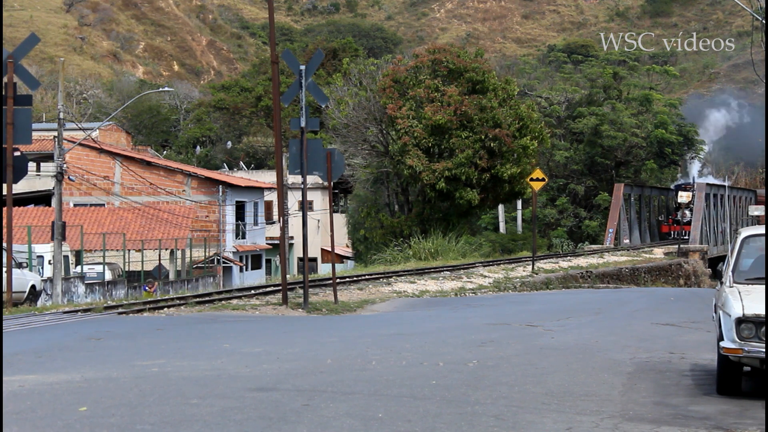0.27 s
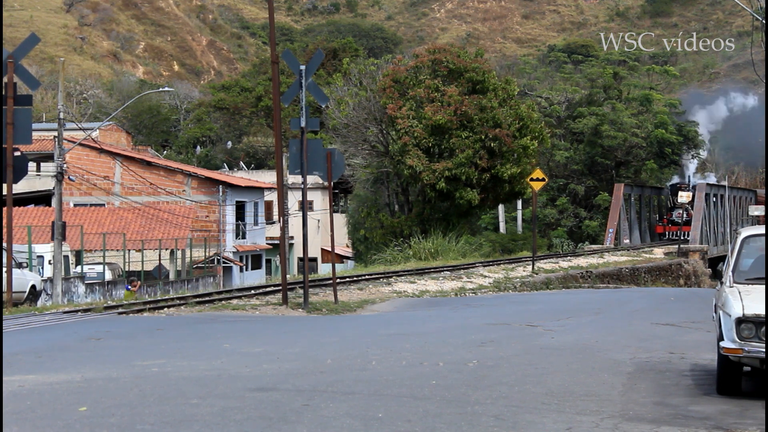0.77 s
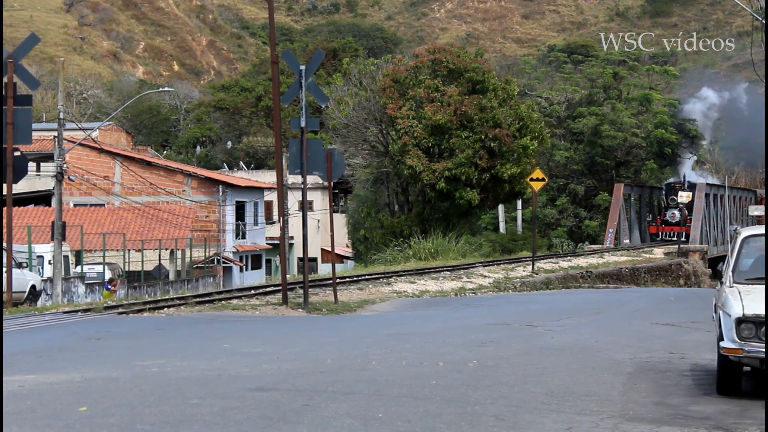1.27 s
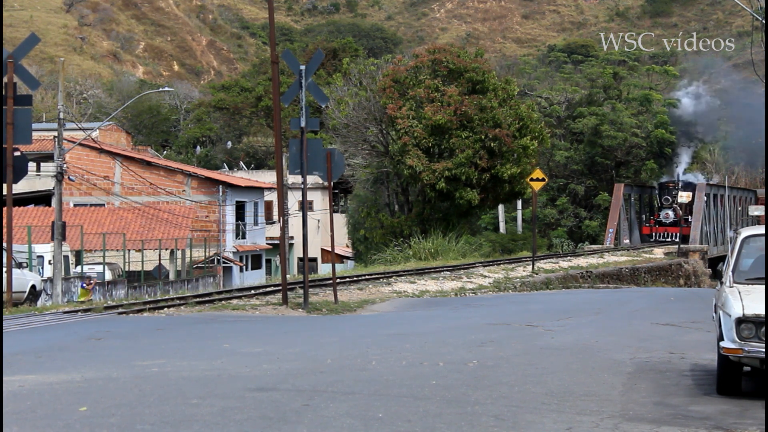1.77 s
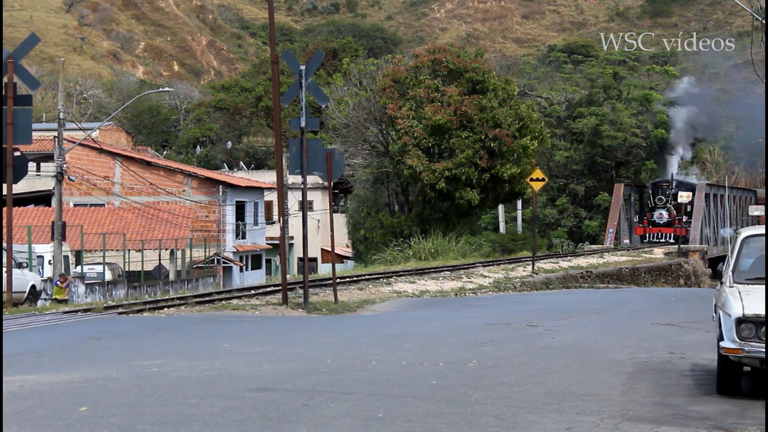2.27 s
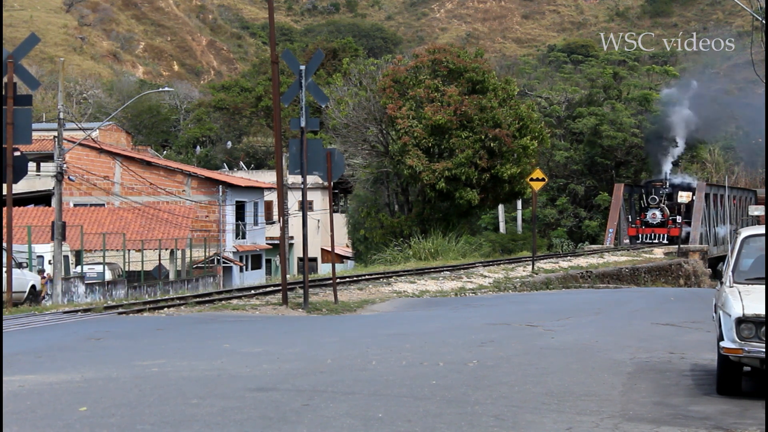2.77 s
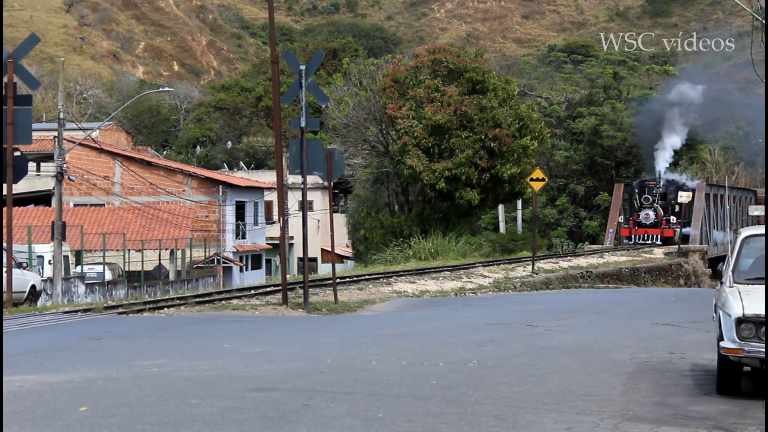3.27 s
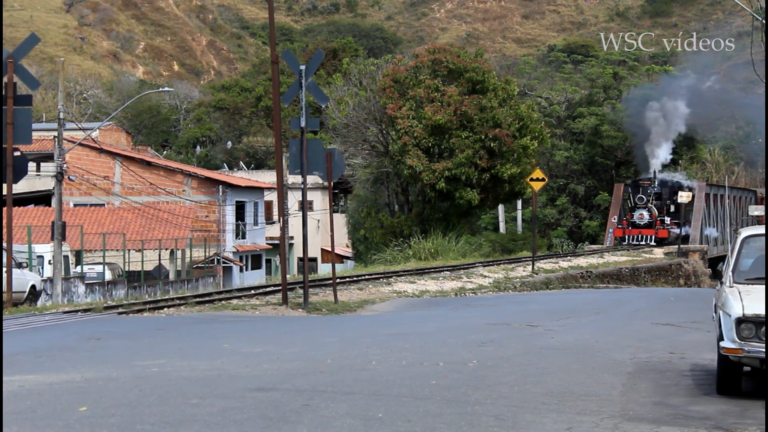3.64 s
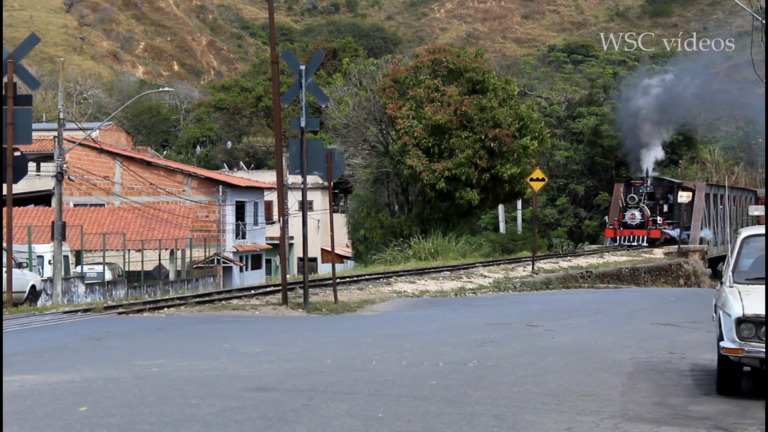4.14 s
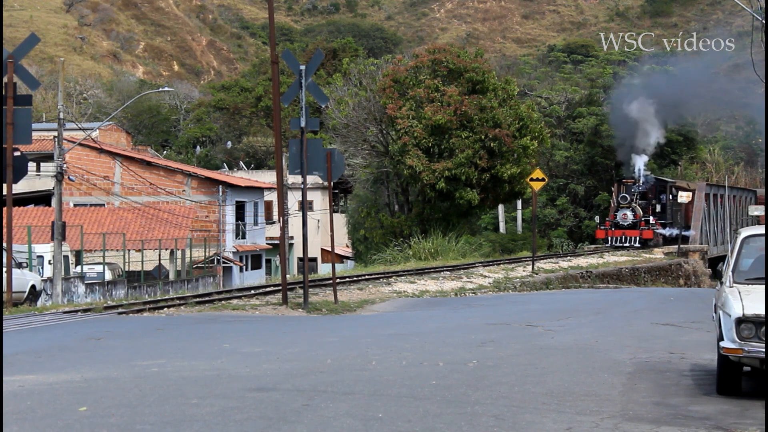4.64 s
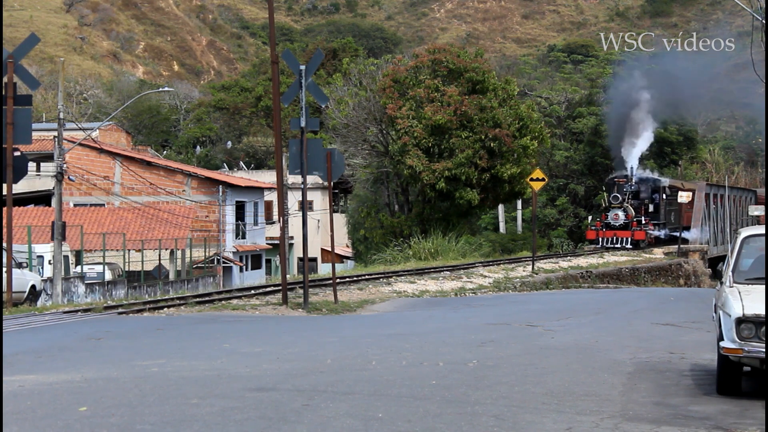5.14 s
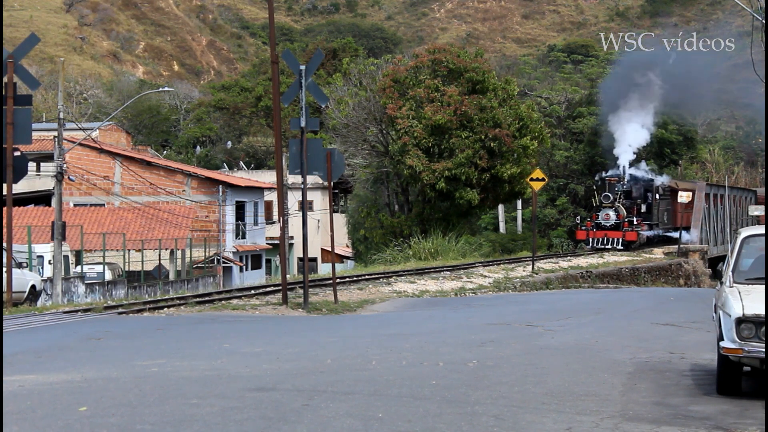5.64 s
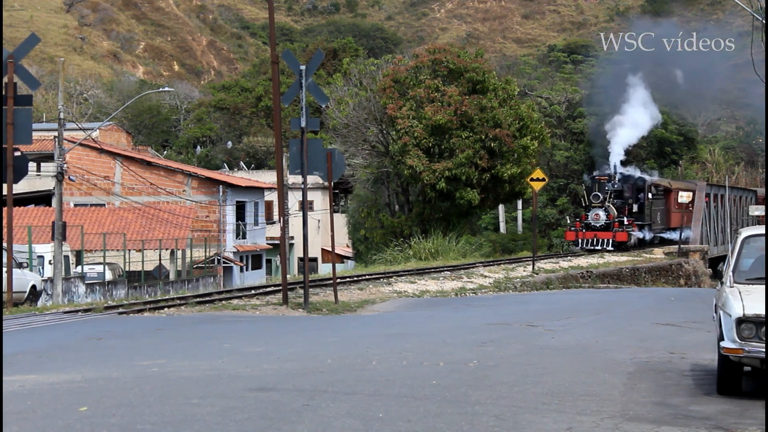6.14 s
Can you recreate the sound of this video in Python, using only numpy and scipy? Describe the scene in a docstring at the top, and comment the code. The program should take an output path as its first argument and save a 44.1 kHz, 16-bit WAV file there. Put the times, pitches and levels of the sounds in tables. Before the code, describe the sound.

Outdoors by a level crossing, a steam locomotive's deep whistle is already blowing, a steady hollow hoot wrapped in breathy steam. After nearly four seconds its pitch droops and wobbles, recovers and stops. A short gap holds only echo and faint hiss, then a much higher, shrill whistle chirps in, pulsing and growing more piercing until the end. Distant rumble stays faint; single-channel pickup from some way off.

```python
"""A steam locomotive's whistles by a level crossing: a long deep blast, under way at 0 s, then a shrill one.
Both are stacks of wavering pipe harmonics; filtered noise makes the steam rushing from their mouths.
Trees and girders behind return flat, beating tones; houses scatter them and slopes echo them, dulled.
Train and street rumble faintly in the distance, a weak moan slides down under the deep blast,
and soft puffs of wind touch the microphone."""
import sys
import numpy as np
from scipy import signal
from scipy.fft import rfft, irfft
from scipy.io import wavfile

SR = 44100
rng = np.random.default_rng(int(sys.argv[2]) if len(sys.argv) > 2 else 0)


def to_wav(sig):
    """Store sig (one row per channel, or 1-D mono) as 16-bit WAV at the path in sys.argv[1].

    Samples outside -1..1 are clipped; the rate is SR.
    """
    pcm = np.clip(np.atleast_2d(sig), -1, 1) * 32767
    pcm = np.round(pcm).astype(np.int16)
    wavfile.write(sys.argv[1], SR, pcm.T)  # frames by channels


N = 282240
TIME = np.arange(N) / SR
BINS_HZ = np.fft.rfftfreq(N, 1 / SR)
DRIFT_STEP = 60  # samples between the points of a slow drift
EDGE_HZ = 15700  # upper band limit of the recorder

# Deep whistle: pitch at full pressure, sag with the cord fully slack, and closing time
DEEP_HZ, SAG_HZ, DEEP_SHUTS_S = 274.04, 9.3, 4.625
# Cord easing off late in the deep blast, then pulled home: [t/s, slack/0-1]
DEEP_CORD_SLACK = [(3.85, 0.01), (3.98, 0.99), (4.13, 0.88), (4.27, .55), (4.39, 0.54), (4.46, 0.06)]
# Moments when the deep pipe overblows: [t/s, half length/s, strength/0-1]
OVERBLOWN_FLARES = [(3.686, 0.053, 0.56), (4.006, 0.069, 0.72), (4.489, 0.025, 0.95)]
# Deep fundamental, before a small trim: [t/s, level/dB]
DEEP_FUNDAMENTAL = [(0.0, -16), (0.09, -13.5), (0.61, -13), (0.77, -13.5), (0.94, -11.5), (1.69, -15),
                    (1.72, -13.5), (2.14, -16), (2.54, -12.5), (2.6, -14), (2.83, -12), (3.07, -16),
                    (3.11, -13.5), (3.53, -16.5), (3.86, -14.0), (3.97, -19), (4.45, -9), (4.62, -15)]
# Deep fourth harmonic, before a small trim: [t/s, level/dB]
DEEP_FOURTH = [(0.0, -26), (0.54, -25.0), (0.71, -32.5), (1.91, -26), (3.31, -26.5), (3.54, -40),
               (3.65, -28), (4.35, -41.5), (4.62, -28.5)]
# Deep seventh harmonic, the thin edge of the tone, before a small trim: [t/s, level/dB]
DEEP_SEVENTH = [(0.0, -36.5), (0.26, -33), (1.03, -44), (1.14, -34), (2.96, -40.5), (3.44, -52),
                (3.58, -40), (4.41, -48), (4.46, -31), (4.58, -29.5), (4.62, -41)]
# Other deep overtones:
# [harmonic number, level at 0 s/dB, change/dB per s, gain at full slack/dB, gain in a full flare/dB]
DEEP_OTHER_OVERTONES = [(2, -37, 0.2, -3, 6.5), (3, -22.5, -0.42, -11.5, 10.5), (5, -36, -.4, 0, 12),
                        (6, -45, 0.73, 5.5, 13), (8, -42.5, -1.13, -.5, 14.5), (9, -43.5, -1.3, -14, 0),
                        (10, -44, -0.66, -9.5, 4), (11, -52, -1, -4, 3), (13, -44, -1, -7, 2)]

# Steam jet of the deep whistle, before trims: [t/s, sizzle level/dB, rush level/dB]
DEEP_JET_LEVELS = [(0.0, -30.5, -34.5), (0.14, -26.5, -30.0), (0.45, -32, -34.5), (0.5, -30.0, -32.0),
                   (0.78, -32.0, -35.5), (1.12, -29, -30), (1.28, -33.5, -34.5), (1.59, -35.0, -34),
                   (1.67, -31.0, -30.5), (2.02, -33.5, -32.5), (2.07, -36, -35.5), (2.81, -28.5, -31),
                   (2.98, -31.5, -34.5), (3.52, -30.0, -35), (3.6, -26.5, -30.5), (4.19, -40.5, -44),
                   (4.31, -34.5, -37), (4.4, -36.5, -44), (4.47, -28, -31), (4.62, -32.0, -36)]
# Colour of a jet's broad rush: [f/Hz, relative level/dB per Hz]
RUSH_COLOUR = [(150, -14.5), (300, -3), (480, -7), (700, -1.5), (1300, -1.5), (1800, 1), (2800, 1),
               (3800, 2), (4800, 0), (6000, -10.5), (8000, -21.5), (11000, -53)]
# Colour of a jet's high sizzle: [f/Hz, relative level/dB per Hz]
SIZZLE_COLOUR = [(2500, -26), (4000, -7), (5500, -2), (7000, 0.5), (8000, -3.5), (9000, -13), (10000, -20),
                 (11500, -30.5), (13000, -42), (15500, -46.5)]

# Distant running gear and street, before trim and drift: [t/s, level/dB]
ROLLING_LEVEL = [(0.0, -45.5), (3.79, -47), (4.48, -40), (4.57, -45), (5.96, -50.5), (6.22, -43),
                 (6.4, -64)]
# Colour of that rumble: [f/Hz, relative level/dB per Hz]
RUMBLE_COLOUR = [(4, -53), (15, -19.5), (35, -8), (60, -11), (90, 0), (140, -5), (188, 4.5), (230, -6),
                 (310, -8), (400, -2.5), (600, -5.5), (1500, -14.5), (4000, -48)]
# Decay of the scattered reflections, which are cut off after 1 s: [f/Hz, t60/s]
VALLEY_DECAY = [(200, 0.38), (800, 0.45), (2000, 4), (5000, 1.5), (10000, .3)]
# Wind on the microphone: [t/s, half length/s, peak level/dB]
WIND_PUFFS = [(.5, .04, -49), (0.712, .022, -39), (2.918, 0.054, -46.5)]
# Colour of the wind: [f/Hz, relative level/dB per Hz]
WIND_COLOUR = [(4, -52), (14, -13), (33, 1), (60, 1), (120, -15), (400, -57), (2000, -91)]
# Faint falling moan: [t/s, f/Hz, level/dB]
MOAN_GLIDE = [(2.35, 638, -63), (2.55, 618, -40), (2.7, 600, -42), (2.8, 591, -37), (3.0, 587.6, -43),
              (3.15, 584, -70)]

# Shrill whistle: starts sharp by the chirp, settles, then creeps up as the pipe warms
SHRILL_OPENS_S, SHRILL_HZ, WARMING_HZ_PER_S = 4.869, 783.2, 11.2
CHIRP_HZ, CHIRP_S = 34.74, .016
BLOOM_S = .034  # its overtones bloom after the fundamental has spoken
WIDENS_AT_S, WIDENS_OVER_S = 5.58, 0.89  # its valve is opened wider towards the end
# Tugs on the shrill cord: [t/s, half length/s, overtone surge/dB, pitch lift/Hz, steam surge/dB]
SHRILL_TUGS = [(4.911, 0.0374, 9.5, 9.5, 8), (5.132, .048, 7.5, 11, 4.5), (5.346, 0.0474, 6, 3.1, 5.5),
               (5.754, 0.041, 3, 0.8, 3), (6.042, 0.0455, 3, 1.15, -1), (6.279, 0.048, 0, 0.55, 1.5)]
# Shrill fundamental, before a small trim: [t/s, level/dB]
SHRILL_FUNDAMENTAL = [(4.89, -9.5), (5.04, -32.5), (5.12, -15), (5.16, -52), (5.31, -14), (5.33, -21.5),
                      (5.65, -13.5), (5.7, -21), (5.77, -12.5), (5.8, -22.5), (5.98, -24.5), (6.0, -36),
                      (6.13, -16), (6.17, -46), (6.2, -15.5), (6.4, -28)]
# Shrill overtones, before surges and bloom: [harmonic number, level/dB, gain with the valve wide/dB]
SHRILL_HARMONICS = [(2, -25, 1.5), (3, -32, 0), (4, -32, 3), (5, -32, 12.5), (6, -36, 5), (7, -42, 1),
                    (8, -49, 13), (9, -50.5, 21), (10, -49, 12)]
# Colour of steam whistling across the short pipe's lip: [f/Hz, relative level/dB per Hz]
LIP_COLOUR = [(600, -34), (1300, -4), (2100, -11), (2700, -12), (3500, -0.5), (4400, 0.5), (5200, -10),
              (6000, -29), (7500, -11), (9000, -9), (11000, -39)]


def gain_of(db):
    """Turns dB into a gain."""
    return np.exp(np.asarray(db) * (np.log(10) / 20))


def evened(x):
    """Scales to rms 1."""
    return x / np.sqrt(np.mean(abs(x) ** 2) + 1e-20)


def read(points, hz):
    """Reads a spectrum on a log-frequency axis."""
    f, value = np.transpose(points)
    return np.interp(np.log(hz + 1), np.log(f + 1), value)


def controls(rows):
    """Each column of a timed table, sample by sample."""
    s, *columns = np.transpose(rows)
    return [np.interp(TIME, s, column) for column in columns]


def swell(s, half):
    """A smooth bump of height 1 around the time s."""
    return np.exp(-.5 * ((TIME - s) / half) ** 2)


def drift(rate):
    """Smooth chance of about rms 1, its changes rolling off above rate in Hz."""
    s = TIME[::DRIFT_STEP]
    hz = np.fft.rfftfreq(len(s), DRIFT_STEP / SR)
    spectrum = rfft(rng.standard_normal(len(s))) / (1 + (hz / rate) ** 2)
    return np.interp(TIME, s, evened(irfft(spectrum, len(s))))


def noise(colour):
    """Noise of rms 1 with the given colour."""
    white = rfft(rng.standard_normal(N))
    return evened(irfft(white * gain_of(read(colour, BINS_HZ)), N))


def valve(opens, shuts, rise, fall):
    """The tone builds when the valve opens and rings down when it shuts; all times in s."""
    building = np.clip((TIME - opens) / rise, 0, 1) ** 2
    return building * np.exp(-np.maximum(TIME - shuts, 0) / fall)


def partial(turns, db, flutter, flutter_rate, fuzz):
    """One pipe mode: a steady tone, fading through moving air, with a skirt of steam noise."""
    along = 1 + flutter * drift(flutter_rate) + fuzz * drift(51)
    across = flutter * drift(flutter_rate) + fuzz * drift(44)
    angle = 2 * np.pi * (turns + rng.random())
    tone = along * np.cos(angle) - across * np.sin(angle)
    return gain_of(db) * tone / np.sqrt(.5+ flutter ** 2 + fuzz ** 2)


def deep_cord():
    """How the deep whistle is worked. Gives (valve opening, slack, flare), each 0-1."""
    slack, = controls(DEEP_CORD_SLACK)
    flare = sum(strength * swell(s, half) for s, half, strength in OVERBLOWN_FLARES)
    return valve(opens=-1, shuts=DEEP_SHUTS_S, rise=.03, fall=0.029), slack, flare


def deep_whistle():
    """A stopped pipe with a strong fundamental; its pitch sags as the cord slackens. Gives (hum, overtones)."""
    blowing, slack, flare = deep_cord()
    hum_db, = controls(DEEP_FUNDAMENTAL)
    fourth_db, = controls(DEEP_FOURTH)
    seventh_db, = controls(DEEP_SEVENTH)
    droop = 1 - 0.056 * (1 - blowing)  # the pitch falls with the dying pressure
    waver = 1 + (0.00091 + 0.0042 * slack) * drift(28) + 0.00089 * drift(4.2)  # unsteady at low pressure
    turns = np.cumsum((DEEP_HZ - SAG_HZ * slack) * droop * waver) / SR
    hum = partial(turns, hum_db - .1, flutter=0.08, flutter_rate=11.6, fuzz=0.023)
    tones = partial(4 * turns, fourth_db - .5, flutter=0.33, flutter_rate=6.4, fuzz=0.016)
    tones += partial(7 * turns, seventh_db + .5, flutter=.3, flutter_rate=11, fuzz=.12)
    for order, db, db_per_s, slack_db, flare_db in DEEP_OTHER_OVERTONES:
        level_db = db + db_per_s * TIME + slack_db * slack + flare_db * flare
        flutter = 0.15 * np.sqrt(order)
        tones += partial(round(order) * turns, level_db, flutter, flutter_rate=7.7, fuzz=0.025 * order)
    return hum * blowing, tones * blowing


def jet(sizzle_db, rush_db):
    """A jet's high sizzle and broad rush, both shaken by the same turbulence."""
    eddies_db = 0.46 * drift(41) + 1.1 * drift(3.8)
    rush = noise(RUSH_COLOUR) * gain_of(rush_db + eddies_db + .7 * drift(15))
    sizzle = noise(SIZZLE_COLOUR) * gain_of(sizzle_db + eddies_db + 0.52 * drift(57))
    return rush + sizzle


def steam():
    """Turbulent steam: each whistle has its own jet, and a faint leak hisses throughout."""
    sizzle_db, rush_db = controls(DEEP_JET_LEVELS)
    deep_blowing, _, _ = deep_cord()
    deep = deep_blowing * jet(sizzle_db + .5, rush_db + 2.0)
    blowing, wide, _, _, surge_db = shrill_cord()
    shrill_sizzle_db = -34.0 + surge_db + 4.3 * wide
    shrill_rush_db = -35.5 + 0.76 * surge_db + .3 * wide
    shrill = blowing * jet(shrill_sizzle_db, shrill_rush_db)
    return deep + shrill + jet(sizzle_db=-42.5, rush_db=-39.0)


def rumble():
    """The distant train and street: low-coloured noise whose level wanders."""
    roll_db, = controls(ROLLING_LEVEL)
    return noise(RUMBLE_COLOUR) * gain_of(roll_db + 3.0 + 1.7 * drift(6))


def behind(x, longest=.3, most_drop=.026, lasts=0.72, count=60):
    """Passing trees and girders reflect in turn; as the train draws away, they sound flat and beat."""
    dull = signal.sosfilt(signal.butter(1, 4000, fs=SR, output="sos"), x)
    out = np.zeros(N)
    passing_s = np.linspace(-.5, TIME[-1] + .5, count)
    for s, (far, receding) in zip(passing_s, rng.random((count, 2))):
        heard = abs(TIME - s) < lasts
        t = TIME[heard]
        stretch = most_drop * (0.2583 + 0.723 * receding)  # s of extra delay per s
        delay = .03 + longest * far ** 1.5 + stretch * (t - s)
        fade = np.cos(np.pi / 2 * (t - s) / lasts)
        # mirrored before 0 s, since the blast is already under way
        out[heard] += fade * np.interp(abs(t - delay), TIME, dull)
    return out


def valley(x):
    """Scattered reflections from houses and trees, with a decay time for each frequency."""
    taps = rng.standard_normal(SR) * (rng.random(SR) < 2000 / SR) * (TIME[:SR] > .012)
    hz, t, z = signal.stft(taps, SR, nperseg=256)
    t60 = read(VALLEY_DECAY, hz)[:, None]
    tail = signal.istft(z * gain_of(-60 * t / t60), SR, nperseg=256)[1]
    loss = np.linalg.norm(taps * gain_of(-60 * TIME[:SR] / t60.max()))
    return signal.fftconvolve(x, tail / loss)[:N]


def hillside(x, delay, db):
    """One echo from a slope beside the line, delayed in s by the path and dulled."""
    dull = signal.sosfilt(signal.butter(1, 1200, fs=SR, output="sos"), x)
    return gain_of(db) * np.interp(TIME - delay, TIME, dull, left=0)


def wind():
    """Soft puffs on the microphone: brief swells of low-frequency noise."""
    gusts = sum(gain_of(db) * swell(s, half) for s, half, db in WIND_PUFFS)
    return gusts * noise(WIND_COLOUR)


def moan():
    """A weak, wavering tone that slides down under the whistle."""
    hz, db = controls(MOAN_GLIDE)
    return partial(np.cumsum(hz) / SR, db, flutter=0.16, flutter_rate=15, fuzz=0.3)


def shrill_cord():
    """Shrill cord and valve: (opening 0-1, widening 0-1, surge dB, pitch lift Hz, steam surge dB)."""
    wide = np.clip((TIME - WIDENS_AT_S) / WIDENS_OVER_S, 0, 1)
    surges = sum(np.outer(sizes, swell(s, half)) for s, half, *sizes in SHRILL_TUGS)
    blowing = valve(opens=SHRILL_OPENS_S, shuts=7, rise=0.02, fall=.025)  # still open at the end
    return (blowing, wide, *surges)


def shrill_whistle():
    """A short pipe blown hard: tugs sharpen it, most also brighten it, and a wider valve makes it piercing."""
    blowing, wide, surge_db, lift_hz, _ = shrill_cord()
    held_s = np.maximum(TIME - SHRILL_OPENS_S, 0)
    chirp_hz = CHIRP_HZ * np.exp(-held_s / CHIRP_S)
    hz = SHRILL_HZ + WARMING_HZ_PER_S * held_s + chirp_hz + lift_hz
    turns = np.cumsum(hz * (1 + .0005 * drift(20))) / SR
    base_db, = controls(SHRILL_FUNDAMENTAL)
    base = partial(turns, base_db + 0.27, flutter=0.24, flutter_rate=10.4, fuzz=0.01)
    edge = noise(LIP_COLOUR) * gain_of(-40.0 + surge_db + 10 * wide)
    for order, db, wide_db in SHRILL_HARMONICS:
        level_db = db + surge_db + wide_db * wide
        flutter = .2 * np.sqrt(order)
        edge += partial(round(order) * turns, level_db, flutter, flutter_rate=14.3, fuzz=.016 * order)
    bloom = np.minimum(held_s / BLOOM_S, 1) ** 2
    return blowing * (base + edge * bloom)


def scene():
    """Direct whistles, their reflections, and the quieter sounds around them, on one channel."""
    hum, overtones = deep_whistle()
    shrill = shrill_whistle()
    whistles = hum + overtones + shrill
    beating = behind(gain_of(-31) * hum + gain_of(-14.5) * overtones + gain_of(-17.5) * shrill)
    scattered = valley(gain_of(-17) * hum + gain_of(-12.0) * overtones + gain_of(-9.5) * shrill)
    echoes = hillside(whistles, delay=.37, db=-20) + hillside(whistles, delay=.5, db=-25.5)
    # the bridge girders close by: the sharp attack returns and beats with the settled tone
    echoes += hillside(shrill, delay=.105, db=-12.5)
    echoes += gain_of(-7.5) * valley(echoes)  # they too scatter on their way back
    surroundings = moan() + steam() + rumble() + wind()
    return (whistles + beating + scattered + echoes + surroundings)[None]


def record(dry):
    """The recorder's band limit: a steep low-pass filter."""
    lowpass = signal.firwin(511, EDGE_HZ, window=("kaiser", 9), fs=SR)
    return signal.oaconvolve(dry, lowpass[None], "same")


dry = scene()
out = record(dry)
to_wav(out)
```